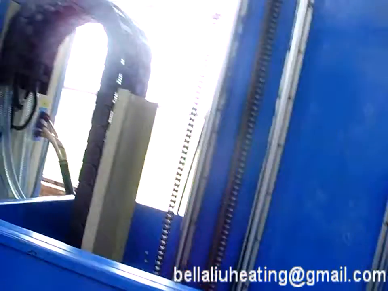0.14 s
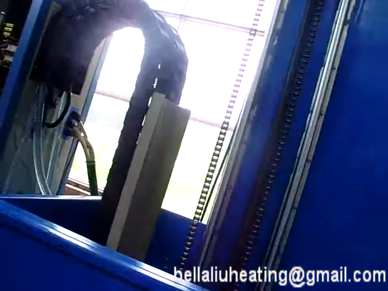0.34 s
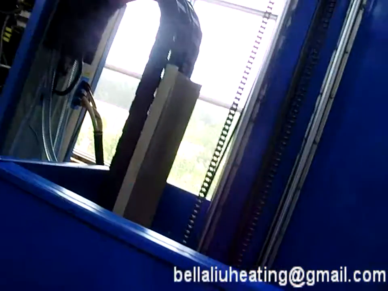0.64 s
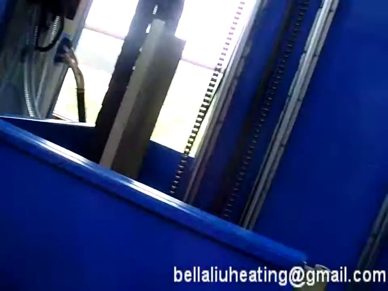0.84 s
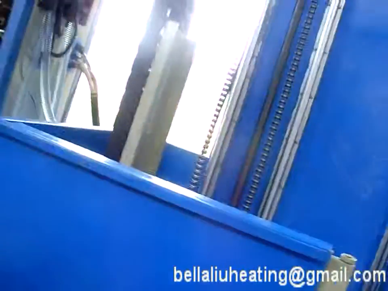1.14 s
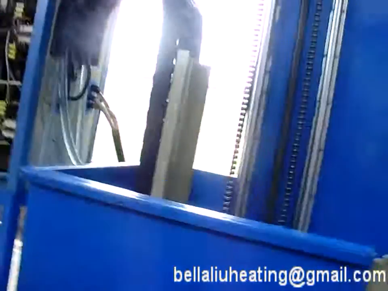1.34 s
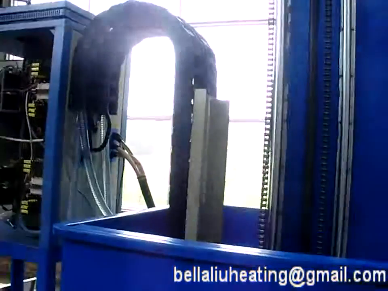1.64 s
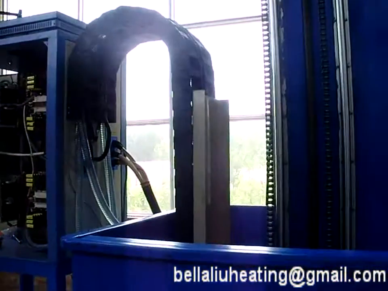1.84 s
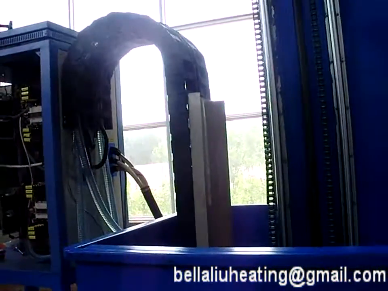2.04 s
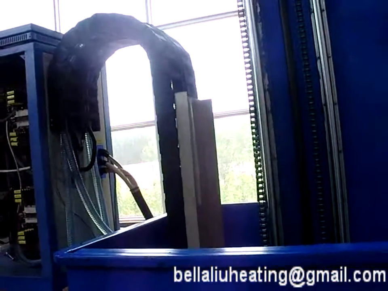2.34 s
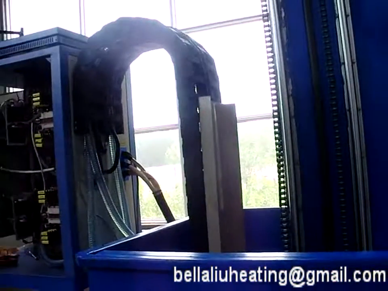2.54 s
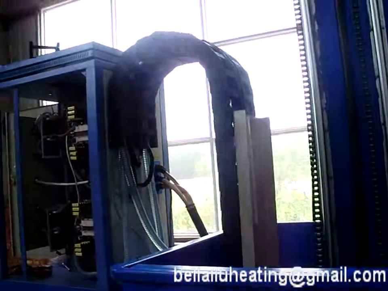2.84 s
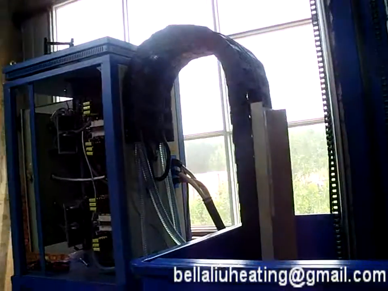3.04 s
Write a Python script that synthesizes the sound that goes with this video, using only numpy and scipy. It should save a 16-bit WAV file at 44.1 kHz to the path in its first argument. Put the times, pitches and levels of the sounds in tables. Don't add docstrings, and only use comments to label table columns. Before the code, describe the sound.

An industrial hardening machine roars throughout, dense and strongest around 500-1000 Hz, with hiss, panel hum, fan tones and an uneven low pump drone. A drive whine rises then fades by 0.7 s. Chain links clank at the start, tinkle around 0.3-0.7, thud lower at 1.0, cluster near 2.1 and knock again near 3.0. Faint squeaks come at 0.9-1.45. Hard workshop echo; dull small microphone.

```python
import sys
import numpy as np
from scipy import signal
from scipy.fft import rfft, irfft, next_fast_len
from scipy.io import wavfile
from scipy.ndimage import uniform_filter1d, map_coordinates

SR = 44100
rng = np.random.default_rng(int(sys.argv[2]) if len(sys.argv) > 2 else 0)


def dump(signal):
    limited = np.clip(np.atleast_2d(signal).T, -1, 1)
    pcm = np.round(limited * 32767).astype(np.int16)
    wavfile.write(sys.argv[1], SR, pcm)


def voltage_ratio(level):
    return 10 ** (np.asarray(level, float) / 20)


N = 141120
TIME_S = np.arange(N) / SR


def unit(x):
    return x / np.sqrt(np.mean(x ** 2) + 1e-20)


def along(points, hz):
    point_hz, value = np.transpose(points)
    return np.interp(np.log(hz + 1), np.log(point_hz + 1), value)


def wobble(knots_per_s):
    return map_coordinates(rng.standard_normal(400), [TIME_S * knots_per_s])


def filtered(x, response):
    size = next_fast_len(N + 8192)
    spectrum = rfft(x, size) * response(np.fft.rfftfreq(size, 1 / SR))
    return irfft(spectrum, size)[..., :N]


def rush(spectrum, patchy_db):
    grains = signal.stft(rng.standard_normal(N + 512), nperseg=512)[2]
    field = uniform_filter1d(rng.standard_normal(grains.shape), size=4, axis=0)
    field = uniform_filter1d(field, size=10, axis=1)
    x = signal.istft(grains * voltage_ratio(patchy_db * unit(field)), nperseg=512)[1][:N]
    return unit(filtered(x, lambda hz: voltage_ratio(along(spectrum, hz))))


def gates(rows, edge_s):
    total = np.zeros(N)
    for start_s, length_s, level_db in rows:
        to_edge_s = np.minimum(TIME_S - start_s, start_s + length_s - TIME_S)
        total += voltage_ratio(level_db) * np.clip(to_edge_s / edge_s + 0.5, 0, 1)
    return total


# start_s, level_db
LOAD = [(0.0, -11.5), (0.03, -18), (0.99, -17), (1.01, -16), (1.36, -19.5), (1.67, -15.5), (1.92, -20),
        (2.01, -15), (2.04, -21), (2.07, -17), (2.69, -18.5), (2.74, -15), (2.91, -18.5), (3.2, -18)]


def load():
    start_s, level_db = np.transpose(LOAD)
    return np.interp(TIME_S, start_s, level_db)


# pitch_hz, density_db_per_hz
ROAR = [(12, -49.5), (20, -28), (38, -19.5), (120, -13), (229, -11), (507, 1), (619, -3.5), (955, -2.5),
        (1500, -16.5), (1950, -41), (3300, -120)]


def roar(load_db):
    return voltage_ratio(load_db - 1.47 + 0.24 * wobble(12)) * rush(ROAR, patchy_db=0.33)


# pitch_hz, density_db_per_hz
HISS = [(650, -27), (1100, -6), (1410, -8.5), (2940, -10), (3630, -17.5), (4000, -27), (5200, -57),
        (8800, -120)]


def hiss(swing_db):
    level_db, follows = -27.5, 0.44
    return voltage_ratio(level_db + follows * swing_db + 0.44 * wobble(20)) * rush(HISS, patchy_db=0.84)


# pitch_hz, width_hz, level_db
PANELS = [(73.7, 6, -42.5), (99.6, 10, -45), (122.5, 13, -40.5), (299.8, 4, -35), (325.2, 5.5, -38.5),
          (347.1, 5.4, -34), (389.3, 9.8, -33.5), (417.8, 10, -34), (693.4, 30, -35.5), (751.7, 15, -34),
          (934, 15, -35.5), (1130, 19, -36.5), (1190, 7, -43)]


def panels(swing_db):
    hum = np.zeros(N)
    for pitch_hz, width_hz, level_db in PANELS:
        shake = rng.standard_normal(N)
        band = filtered(shake, lambda hz: 1 / (1 + (2 * (hz - pitch_hz) / width_hz) ** 2))
        hum += voltage_ratio(level_db) * unit(band)
    return voltage_ratio(0.2 * swing_db) * hum


def machine():
    load_db = load()
    swing_db = load_db - load_db.mean()
    return roar(load_db) + hiss(swing_db) + panels(swing_db)


# start_s, level_db
DRONE = [(0, -43), (.2, -34), (.38, -35.5), (.46, -30.5), (.72, -30), (.8, -43.5), (1.0, -42),
         (1.07, -28.5), (1.3, -36.5), (1.7, -44), (1.85, -35.5), (2.08, -28.5), (2.2, -37), (2.45, -34),
         (2.65, -39), (2.83, -32.5), (2.92, -40), (3.2, -41)]


def pump_drone():
    pitch_hz = 198.5
    start_s, level_db = np.transpose(DRONE)
    tone = np.sin(2 * np.pi * pitch_hz * TIME_S + 0.26 * wobble(5.5))
    return voltage_ratio(np.interp(TIME_S, start_s, level_db) + 3.0) * tone


# pitch_hz, start_level_db, end_level_db
BLADES = [
    (507.6, -26.5, -34.5),
    (563.7, -29, -33),
    (273.2, -36.5, -36.5),
    (133.1, -42.5, -37),
]


def fan_blades():
    total = np.zeros(N)
    for pitch_hz, start_db, end_db in BLADES:
        level_db = 2.5 + start_db + (end_db - start_db) * TIME_S / TIME_S[-1] + 1.3 * wobble(7)
        total += voltage_ratio(level_db) * np.sin(2 * np.pi * pitch_hz * TIME_S + 0.83 * wobble(5))
    return total


# start_s, pitch_hz, level_db
WHINE = [
    (0, 873, -31),
    (.09, 910, -32),
    (.15, 995, -31),
    (.24, 1006, -37),
    (.36, 1015, -32.5),
    (.47, 1000, -29),
    (.56, 970, -33),
    (.68, 950, -55),
]


def drive():
    start_s, pitch_hz, level_db = np.transpose(WHINE)
    phase = 2 * np.pi * np.cumsum(np.interp(TIME_S, start_s, pitch_hz)) / SR
    return voltage_ratio(np.interp(TIME_S, start_s, level_db) + 1.5 * wobble(18)) * np.sin(phase)


def strike(level_db, pitch_hz, t60_s, crack_db):
    ring_spread, side_mode_db = 0.08, -5
    crack_t60_s, attack_s = 0.045, 0.002
    t = np.arange(SR // 4) / SR
    side = np.arange(6)[:, None] > 0
    detune, phase = rng.standard_normal((2, 6, 1))
    mode_hz = pitch_hz * (1 + ring_spread * detune * side)
    modes = np.sin(2 * np.pi * mode_hz * t + 3 * phase)
    ring = (voltage_ratio(side_mode_db * side) * modes).sum(0)
    crack = voltage_ratio(crack_db - 60 * t / crack_t60_s) * np.diff(rng.standard_normal(len(t) + 1))
    attack = 1 - np.exp(-t / attack_s)
    return attack * (voltage_ratio(level_db - 3 - 60 * t / t60_s) * ring + 4 * crack)


# start_s, level_db, pitch_hz, t60_s, crack_db
CLANKS = [(0.002, -17, 2700, .1, -24), (0.014, -19, 2350, .12, -28), (0.1486, -26, 3300, .05, -24),
          (0.186, -20, 2890, .05, -26), (0.542, -25, 2160, .08, -28), (0.5596, -22, 1900, .1, -22),
          (0.671, -26, 3000, .05, -28), (1.01, -16, 480, .2, -30), (1.172, -24, 2480, .06, -28),
          (1.5095, -26, 3600, .04, -24), (1.925, -23, 2890, .06, -28), (2.088, -23, 1930, .08, -28),
          (2.114, -22, 1950, .07, -25), (2.141, -22, 2900, .1, -21), (2.155, -22, 3100, .07, -23),
          (2.413, -27, 3300, .04, -27), (2.5, -26, 3300, .04, -23), (2.616, -19, 3000, .045, -19),
          (2.938, -23, 2550, .08, -26), (2.948, -25, 3300, .05, -24), (2.995, -23, 2890, .06, -30),
          (3.041, -22, 2510, .07, -24), (3.043, -17, 1190, .16, -30)]


def clanks():
    out = np.zeros(N + SR)
    for start_s, level_db, pitch_hz, t60_s, crack_db in CLANKS:
        hit = strike(level_db, pitch_hz, t60_s, crack_db)
        out[round(start_s * SR):][:len(hit)] += hit
    return out[:N]


# start_s, level_db
TINKS = [(.26, -25), (.345, -22.5), (.392, -23.5), (.435, -23.5), (.455, -24.5), (.497, -22), (.515, -22),
         (.68, -23.5), (1.19, -24), (2.96, -23.5)]


def tinks():
    pitch_hz, t60_s = 2907, 0.078
    out = np.zeros(N + SR)
    for start_s, level_db in TINKS:
        hit = strike(level_db, pitch_hz, t60_s, level_db - 14)
        out[round(start_s * SR):][:len(hit)] += hit
    return out[:N]


def rattle():
    ticks_per_s, top_hz, level_db = 120, 3215, -38.5
    scatter_db, decay_cycles = 4, 3.6
    chance = rng.random((600, 3))
    start = (np.cumsum(-np.log(chance[:, 0])) / ticks_per_s * SR).astype(int)
    pitch_hz = top_hz * voltage_ratio(6 * (chance[:, 1:2] - 1.0))
    k = np.arange(400)
    gain = voltage_ratio(-scatter_db * np.log(0.055 + chance[:, 2:]))
    decay = np.exp(-k / SR * pitch_hz / decay_cycles)
    ticks = gain * np.sin(2 * np.pi * pitch_hz * k / SR) * decay
    train = np.bincount((start[:, None] + k).ravel(), ticks.ravel(), N)[:N]
    return voltage_ratio(level_db) * unit(train)


def hall(x):
    t60_s, gap_s = 0.38, 0.008
    t = np.arange(SR // 2) / SR
    tail = rng.standard_normal(len(t)) * voltage_ratio(-60 * t / t60_s) * (t > gap_s)
    return signal.fftconvolve(x, tail / np.linalg.norm(tail))[:N]


# pitch_hz, level_db
MIC = [(3000, 0.5), (3500, 2), (3900, -9)]


def chain():
    dry = clanks() + tinks() + rattle()
    wet = dry + voltage_ratio(-5.5) * hall(dry)
    return filtered(wet, lambda hz: voltage_ratio(along(MIC, hz)))


# start_s, length_s, level_db
WHISTLE = [
    (0.868, 0.028, -52.5),
    (0.923, 0.084, -48),
    (1.076, 0.033, -49.5),
    (1.243, 0.083, -54),
    (1.404, 0.047, -57.5),
]


def whistle():
    pitch_hz = 3932
    return voltage_ratio(4) * gates(WHISTLE, edge_s=0.008) * np.sin(2 * np.pi * pitch_hz * TIME_S)


def scene():
    tones = pump_drone() + fan_blades() + drive()
    return (machine() + tones + chain() + whistle())[None]


RATE_HZ = 8000


def band_limited(dry):
    edge_hz = 6
    return filtered(dry, lambda hz: np.clip((RATE_HZ / 2 - hz) / edge_hz, 0, 1))


# pitch_hz, level_db
MIRROR = [(4000, -0.5), (4300, -8), (4500, -15.5), (4800, -26), (5050, -39), (5400, -65.5), (6000, -93)]


def mirror_image(band):
    folded = 2 * band * np.cos(2 * np.pi * RATE_HZ * TIME_S)
    return filtered(folded, lambda hz: voltage_ratio(along(MIRROR, hz)) * (hz < 7000))


# start_s, length_s, level_db
BURSTS = [
    (.185, .025, -81),
    (.535, .035, -83),
    (2.095, .11, -83),
    (2.14, .03, -82),
    (3.045, .022, -79),
]
# pitch_hz, density_db_per_hz
BURST_COLOUR = [(5000, -0.5), (6200, -1), (8000, -11), (16000, -14)]


def faint_bursts():
    return gates(BURSTS, edge_s=0.006) * rush(BURST_COLOUR, patchy_db=-1.0)


# pitch_hz, density_db_per_hz
FLOOR = [(5000, -9), (6800, -9), (7600, -0.5), (9900, -0.5), (10500, -6.5), (11500, 0.5), (12500, -1.5),
         (13600, -0.5), (14400, -7), (17000, -6.5)]


def faint_floor():
    return voltage_ratio(-90.5) * rush(FLOOR, patchy_db=1.3)


def top_cut(x):
    return signal.sosfilt(signal.butter(12, 15700, fs=SR, output="sos"), x)


def record(dry):
    offset = -0.0044
    band = band_limited(dry)
    mix = band + mirror_image(band) + faint_floor() + faint_bursts() + offset
    return top_cut(mix)


dry = scene()
out = record(dry)
dump(out)
```